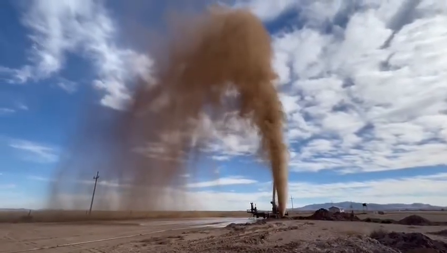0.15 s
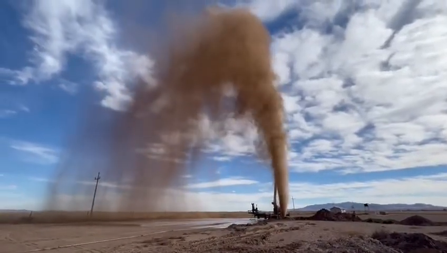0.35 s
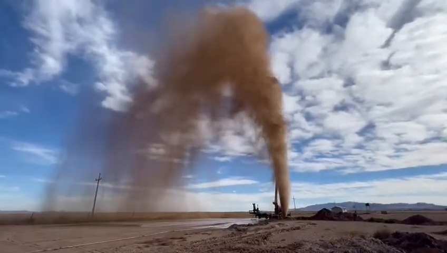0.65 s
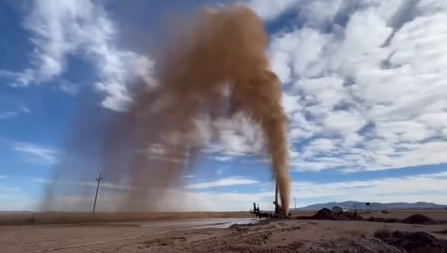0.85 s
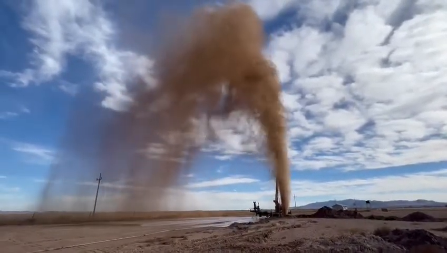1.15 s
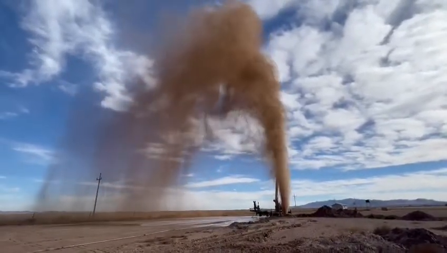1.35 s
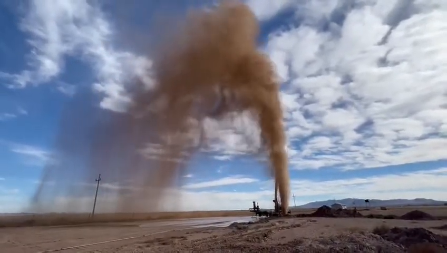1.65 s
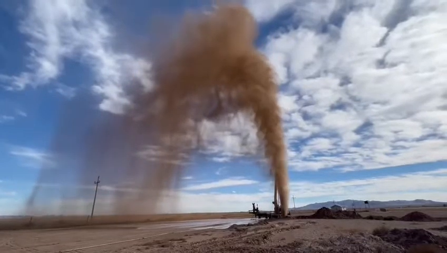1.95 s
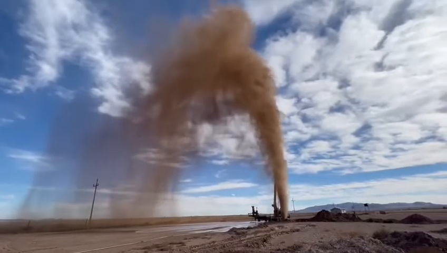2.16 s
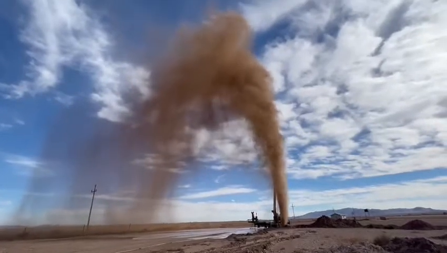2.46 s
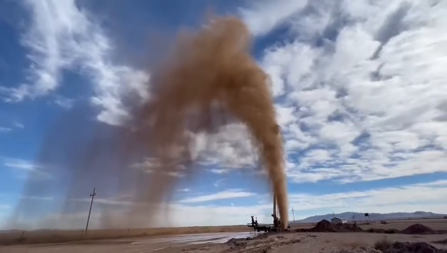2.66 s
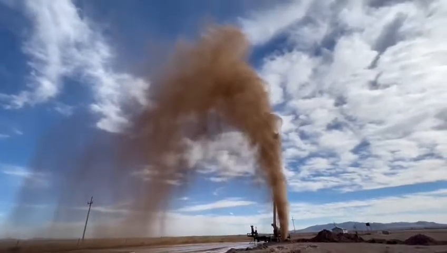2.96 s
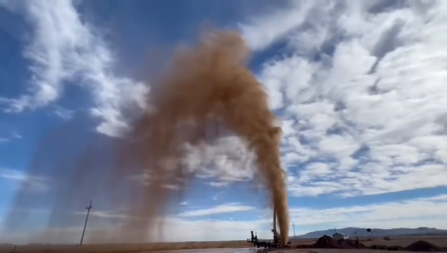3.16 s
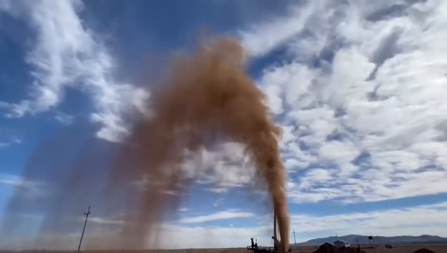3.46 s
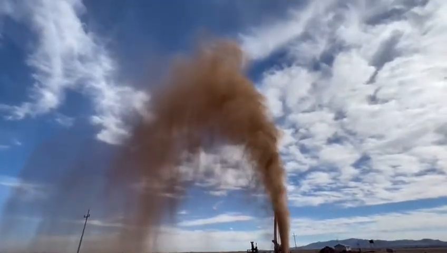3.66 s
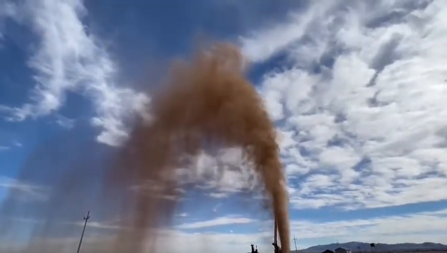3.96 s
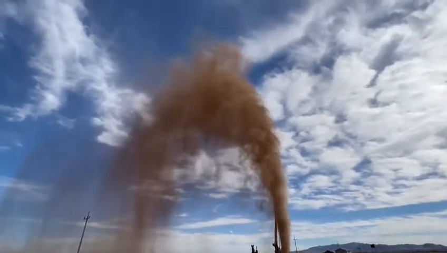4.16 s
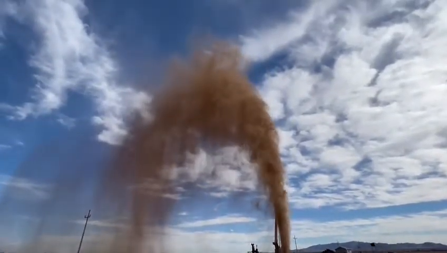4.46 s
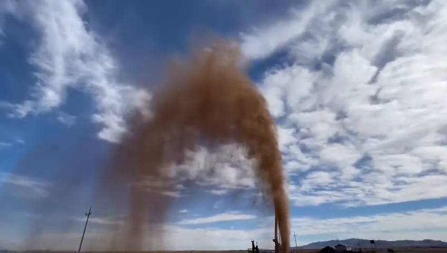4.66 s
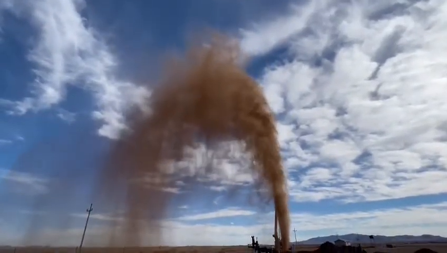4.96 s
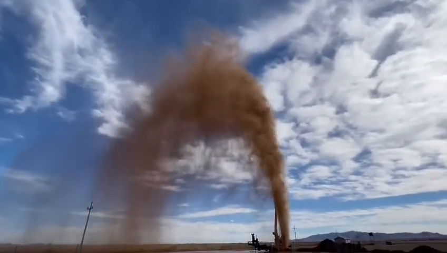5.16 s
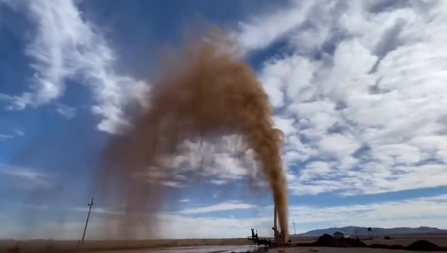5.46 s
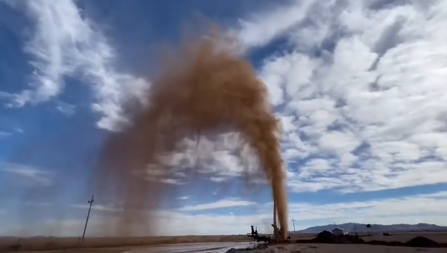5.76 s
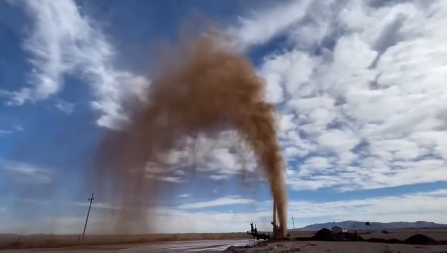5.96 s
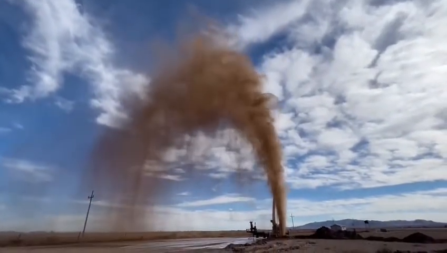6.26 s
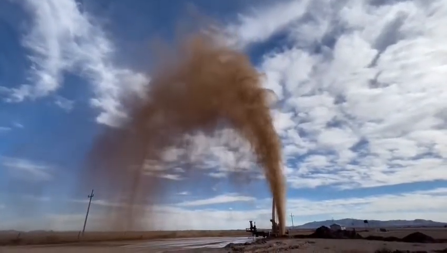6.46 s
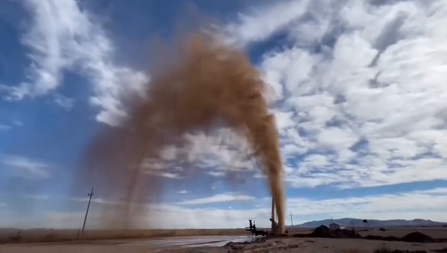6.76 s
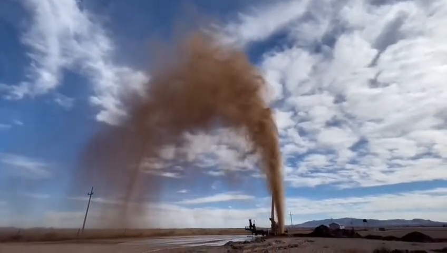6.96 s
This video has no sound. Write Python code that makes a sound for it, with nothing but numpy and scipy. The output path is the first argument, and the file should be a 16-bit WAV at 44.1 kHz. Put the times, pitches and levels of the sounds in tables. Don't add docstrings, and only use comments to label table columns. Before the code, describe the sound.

A constant rough roar of air and mud bursting from a borehole over throbbing diesel drone, with one sharp close droplet snap early on.

```python
import sys
import numpy as np
from scipy import signal
from scipy.fft import rfft, irfft
from scipy.io import wavfile

SR = 44100
rng = np.random.default_rng(int(sys.argv[2]) if len(sys.argv) > 2 else 0)


def voltage_ratio(decibels):
    exponent = np.asarray(decibels, float) / 20
    return 10 ** exponent


def generate_wav(sig):
    pcm = np.round(np.clip(np.atleast_2d(sig).T, -1, 1) * 32767).astype(np.int16)
    wavfile.write(sys.argv[1], SR, pcm)


N = 313551
HZ = np.fft.rfftfreq(N, 1 / SR)
TIME = np.arange(N) / SR

# firing or lobe rate_hz, first_firing_s
MACHINES = [
    (89.985, .0087),
    (80.37, .0023),
    (102.06, .0005),
    (149.07, .0015),
    (135.9, .0003),
]


def rms_one(x):
    return x / np.sqrt(np.mean(x ** 2) + 1e-20)


def at_hz(points, hz):
    table = np.array(points)
    return np.interp(np.log(hz + 1), np.log(table[:, 0] + 1), table[:, 1])


def drift(rate_hz):
    stride, warm_up = 40, 3000
    r = np.exp(-2 * np.pi * rate_hz * stride / SR)
    noise = rng.standard_normal(N // stride + warm_up + 2)
    slow = signal.lfilter([1], [1, -2 * r, r * r], noise)[warm_up:]
    return np.interp(np.arange(N) / stride, np.arange(len(slow)), rms_one(slow))


def resonance(x, hz, width_hz):
    r = np.exp(-np.pi * width_hz / SR)
    poles = [1, -2 * r * np.cos(2 * np.pi * hz / SR), r * r]
    return signal.lfilter([(1 - r * r) / 2, 0, (r * r - 1) / 2], poles, x)


def exhausts(air_db, wobble_rad):
    order_db = [
        [-19.5, -34, -38, -48.0],
        [-30, -43, -53, -42],
        [-31, -46, -57, -48.5],
        [-29.5, -41, -55.5, -59],
        [-34.5, -52.5, -62, -61],
    ]
    out = np.zeros(N)
    for (rate_hz, first_s), levels in zip(MACHINES, order_db):
        phase = 2 * np.pi * rate_hz * (TIME - first_s) + wobble_rad * drift(.8)
        tones = sum(voltage_ratio(db) * np.sin((k + 1) * phase) for k, db in enumerate(levels))
        out += np.sqrt(2) * tones * voltage_ratio(air_db * drift(1.2))
    return out


def clatter(slip):
    clatter_db = [-33.5, -37]
    # centre_hz, width_hz, level_db
    casing = [(683, 290, 1.5), (1200, 450, -4), (400, 180, -9.5)]
    steps = 400
    out = np.zeros(N)
    for (rate_hz, _), level_db in zip(MACHINES, clatter_db):
        contacts = rng.standard_normal(steps)
        closed = np.append(contacts, contacts[0])
        angle = (rate_hz / 6 * TIME + slip * drift(.6)) % 1
        loop = np.interp(angle * steps, np.arange(steps + 1), closed)
        rung = 0
        for k, (hz, width_hz, db) in enumerate(casing):
            rung = rung + (-1) ** k * voltage_ratio(db) * resonance(loop, hz, width_hz)
        out += voltage_ratio(level_db) * rms_one(rung)
    return out


def blast(level_db, patchy_db, surge_db):
    # start_s, rumble_db, roar_db, hiss_db
    course = [(0.0, -44, -28.5, -46), (0.46, -39.5, -29.5, -45.5), (0.57, -49, -31, -47),
              (0.79, -46.5, -29.5, -44.5), (1.35, -44, -29, -47.5), (1.54, -47, -30, -46),
              (1.74, -48, -29.5, -47), (1.98, -44, -30.5, -45), (2.08, -47, -29, -45.5),
              (2.2, -45, -30.5, -46.5), (2.67, -45, -29.5, -46.5), (2.83, -45, -29, -47.5),
              (3.09, -47, -29.5, -46.5), (3.32, -43, -29, -46.5), (3.76, -46, -30, -46.5),
              (3.98, -41, -28.5, -45), (4.14, -42, -29, -45), (4.57, -47, -29, -46),
              (5.09, -46, -29.5, -47.5), (5.78, -42, -29, -46), (5.94, -44, -28.5, -46),
              (6.2, -45, -28, -46.5), (6.42, -43.5, -28.5, -46.5), (6.83, -43, -29, -46.5),
              (7.11, -44, -29, -45.5)]
    # rumble, roar and hiss level_db at which the jet spectrum holds
    rest_db = [-42.5, -30.0, -46.5]
    # frequency_hz, density_db (dB per Hz)
    spectrum = [(25, -67.5), (45, -53.5), (75, -47.5), (150, -46.5), (250, -53.5), (420, -56.5),
                (620, -52.5), (1250, -53.5), (1500, -58), (2300, -65), (3200, -76), (3900, -76.5),
                (6300, -84.5), (9200, -91)]
    start_s, *curves = np.transpose(course)
    rumble, roar, hiss = [np.interp(TIME, start_s, c) - rest for c, rest in zip(curves, rest_db)]
    white = rfft(rng.standard_normal((2, N)))
    jet = white * voltage_ratio(at_hz(spectrum, HZ) + level_db)
    place = 2 * np.log2(HZ / 20 + 1e-9)
    surge = drift(9.0)
    out = 0
    for k in range(20):
        window = np.cos(np.pi / 2 * np.clip(place - k, -1, 1)) ** 2
        if k < 4:
            slow_db = rumble
        elif k < 15:
            slow_db = roar * (k > 6)
        else:
            slow_db = hiss
        flicker_db = patchy_db * drift(14.3) + surge_db * surge * (k > 8)
        out = out + irfft(jet * window, N) * voltage_ratio(slow_db + flicker_db)
    return out


def patter(per_s, level_db):
    sizes = voltage_ratio(4.2 * np.minimum(rng.exponential(1, N), 4)) * rng.choice([-1, 1], N)
    lands = sizes * (rng.random(N) < per_s / SR) + 1e-18
    pitches_hz = np.geomspace(500, 3000, 10)
    dealt = rng.integers(0, 10, N)
    slaps = sum(resonance(lands * (dealt == k), hz, hz / 2.5) for k, hz in enumerate(pitches_hz))
    return voltage_ratio(level_db) * rms_one(slaps)


def snap():
    # start_s, pitch_hz, length_ms, peak_db, left_minus_right_db
    bursts = [
        (0.42, 8050, 0.45, -13, 7),
        (0.42, 5690, 0.24, -8.5, 8),
        (0.4213, 3330, 0.38, -9, 4),
        (.4210, 1700, 0.44, -7.5, 6.0),
        (.4242, 4200, .5, -23, 3.0),
    ]
    out = np.zeros((2, N))
    t = TIME[:SR]
    for start_s, hz, ms, db, pan_db in bursts:
        envelope = np.exp(-.5 * ((t - start_s) / (ms * 0.00074)) ** 2)
        burst = voltage_ratio(db) * envelope * np.cos(2 * np.pi * hz * (t - start_s))
        out[:, :SR] += burst * voltage_ratio(np.array([[0], [-pan_db]]))
    return out


def ports(left, unrelated):
    # frequency_hz, share common to both ports (0 to 1)
    likeness = [(40, 0.95), (90, 0.98), (240, 0.86), (600, 0.84), (1500, 0.75), (2000, 0.36), (2950, 0.69),
                (3500, 0.39), (4800, 0.61), (5900, 0.34), (6800, 0.52), (9000, 0.29)]
    # frequency_hz, left_minus_right_db
    balance_db = [(60, -2.0), (110, -2.0), (190, 0), (330, 0), (570, 5), (1010, 4.5), (1780, 3.0),
                  (3130, 2), (5500, 1.5), (9670, -1.5)]
    # frequency_hz, lead_rad
    lead = [(0, 0), (520, 2.0), (1720, 3.5), (2070, 4), (2760, 5.5), (3010, 7.5), (3450, 8.5), (4130, 6),
            (4820, 2), (5080, 3), (6370, 8), (6890, 4.5), (7490, 6), (9820, 9.5)]
    wide, point = left
    alike = np.clip(at_hz(likeness, HZ), 0, 1)
    lag = np.exp(-1j * np.interp(HZ, *np.transpose(lead)))
    own = np.sqrt(1 - alike ** 2) * rfft(unrelated)
    right = (alike * rfft(wide) + own + rfft(point)) * lag
    return np.array([wide + point, irfft(right * voltage_ratio(-at_hz(balance_db, HZ)), N)])


def scene():
    machines = exhausts(air_db=1.0, wobble_rad=.12) + clatter(slip=0.0019)
    air, other_air = blast(level_db=43.0, patchy_db=1.19, surge_db=0.43)
    plume = air + patter(per_s=300, level_db=-44.0)
    return ports([plume, machines], other_air) + snap()


def low_pass(x):
    return signal.sosfilt(signal.butter(12, 10270, fs=SR, output="sos"), x)


def record(dry):
    # low_hz, high_hz
    gaps_hz = [
        (5240, 5450),
        (7550, 7870),
        (10300, 22050),
    ]
    left, right = dry
    self_noise = voltage_ratio(-46.0) * rng.standard_normal(N)
    mid, side = rfft([left + right, left - right + self_noise]) / 2
    for low, high in gaps_hz:
        gap = (HZ > low) & (HZ < high)
        mid = mid * np.where(gap, voltage_ratio(-28.0), 1)
        side = side * np.where(gap & (HZ < 9000), voltage_ratio(-5.5), 1)
    side = side * (HZ < 11700)
    return low_pass(irfft([mid + side, mid - side], N))


dry = scene()
out = record(dry)
generate_wav(out)
```